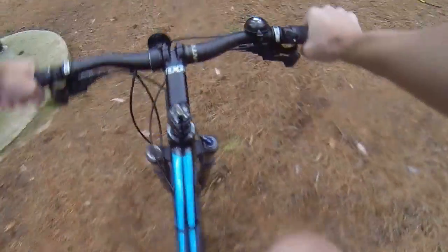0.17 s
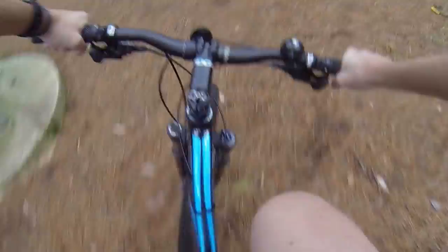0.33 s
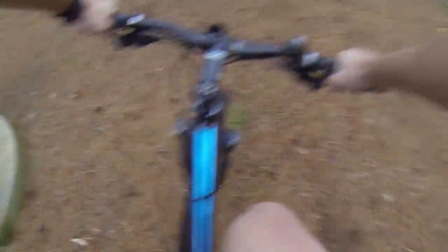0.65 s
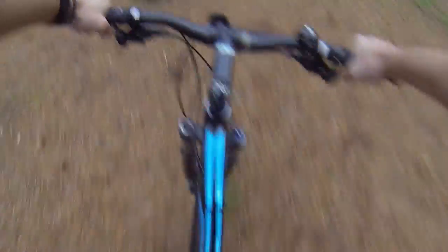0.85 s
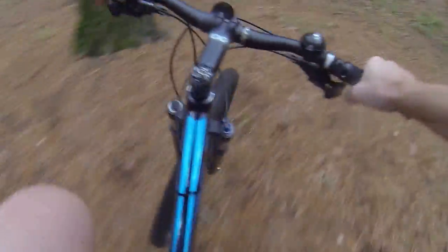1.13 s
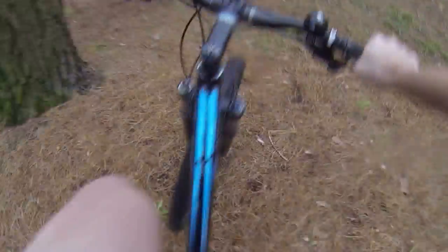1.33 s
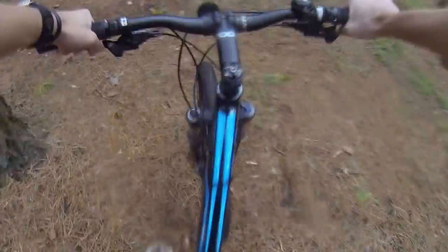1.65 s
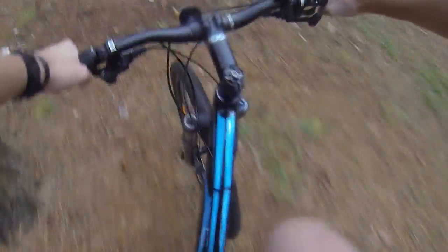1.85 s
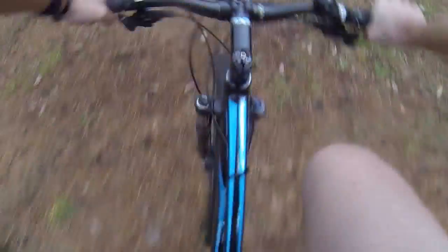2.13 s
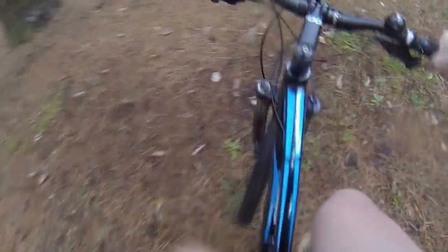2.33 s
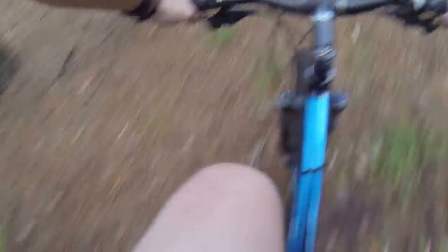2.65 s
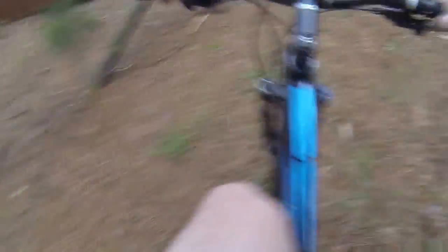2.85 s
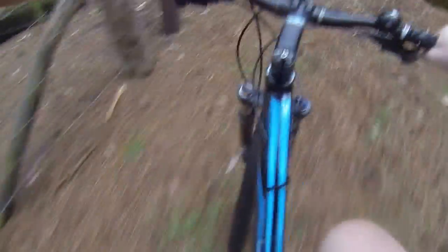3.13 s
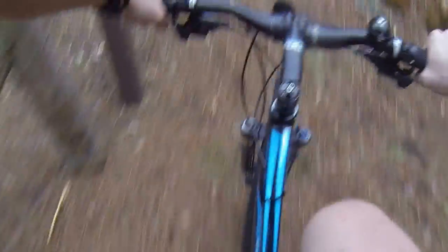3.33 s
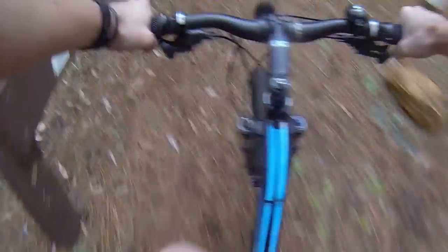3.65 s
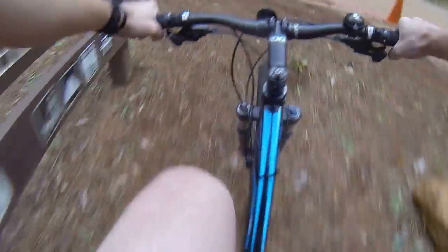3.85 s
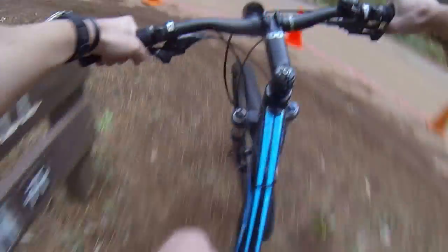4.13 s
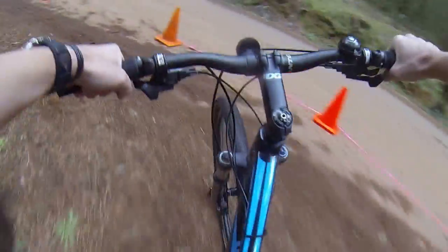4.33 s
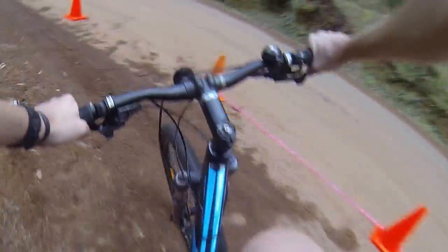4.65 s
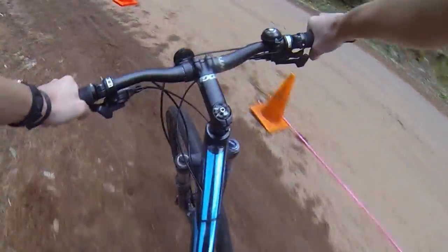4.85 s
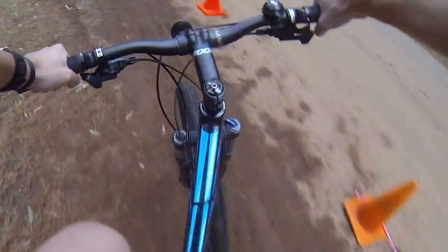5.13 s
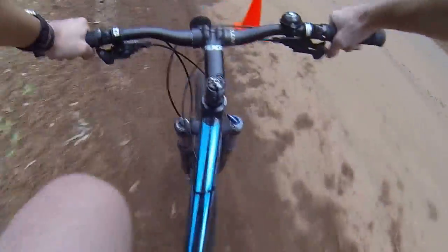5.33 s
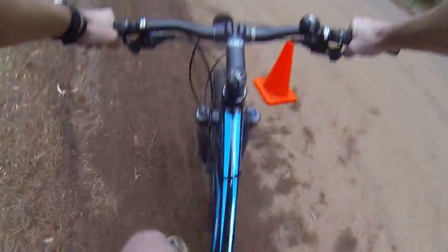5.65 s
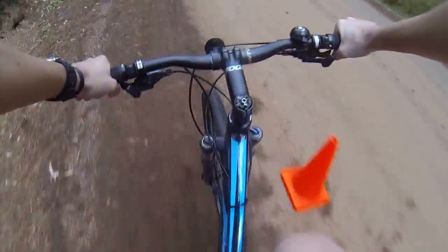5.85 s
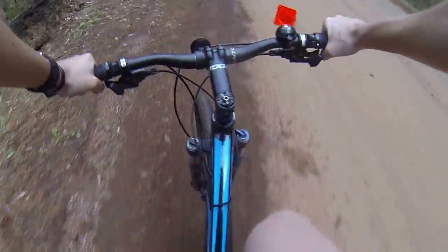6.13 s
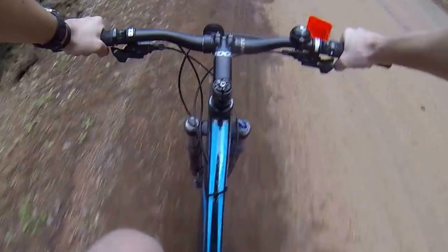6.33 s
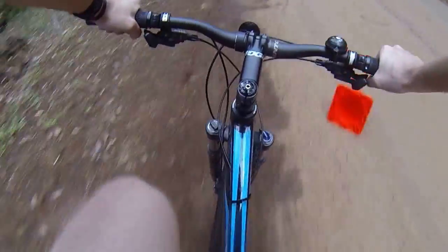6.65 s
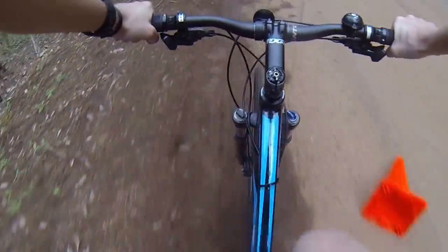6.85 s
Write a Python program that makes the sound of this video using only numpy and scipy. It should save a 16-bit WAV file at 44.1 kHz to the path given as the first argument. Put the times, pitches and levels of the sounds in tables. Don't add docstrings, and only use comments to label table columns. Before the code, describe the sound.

The microphone is in a closed plastic case on a mountain bike rider, so everything is boxy, mid-heavy and close. A brief deep lurch opens it, then tyres crunch in uneven bursts over needles and twigs. From 0.35 to 1 second, soft low thumps of the mount mix with dry clicks of chain and cable. Heavy, dull pressure jolts land at 1.3 and, hardest, 1.7. After a quieter stretch, small squeaky rubs come around 2.5, then the strongest humming knocks and a sharp rattle at 2.7 to 2.85. Another jolt falls at 3.4. Around 3.7 a short rub leads onto gravel, with softer crunches and lighter knocks. Bright cracks snap at 4.6 and 5.95, metallic ticks cluster near 4.9, and a short jolt hits at 5.6. Faint wind and fine spray increase slightly toward the end, with ticks near 6.85. Thin hiss, high whine and fast buzz stay very faint throughout.

```python
import sys
import numpy as np
from scipy import signal
from scipy.fft import rfft, irfft, next_fast_len
from scipy.io import wavfile
from scipy.ndimage import uniform_filter1d, map_coordinates

SR = 44100
rng = np.random.default_rng(int(sys.argv[2]) if len(sys.argv) > 2 else 0)


def to_linear_factor(level_db):
    exponent = np.asarray(level_db, float) / 20
    return 10 ** exponent


def transcribe(signal):
    frames = np.atleast_2d(signal).T
    limited = np.clip(frames, -1, 1)
    pcm = np.round(limited * 32767).astype(np.int16)
    wavfile.write(sys.argv[1], SR, pcm)


N = 307818
TIME = np.arange(N) / SR

# time_s, rolling_db, fine_grit_db, tremor_db
TRACK = [(0, -51, -75, -41.5), (.21, -60, -74, -45.5), (.39, -48, -67, -44), (.56, -51.5, -68, -36.5),
         (1.06, -55.5, -70.5, -43), (1.7, -54.5, -69, -41.5), (2.1, -50.5, -72, -45.5),
         (2.55, -55, -80, -39), (2.82, -49.5, -64, -31), (3.13, -55, -75, -47), (3.56, -61.5, -82, -41.5),
         (3.72, -56, -62, -50), (4.35, -56, -68, -44), (4.6, -57, -73, -39), (5.77, -58, -69.5, -42),
         (6.24, -55, -69.5, -42.5), (6.71, -62.5, -68.5, -37.5), (6.98, -57.5, -67, -42.5)]
# time_s, body_sway_db, seal_wind_db
RIDER_COURSE = [(0, -17, -79), (.15, -50, -89), (.35, -32, -79), (1.0, -32, -85), (1.3, -35, -82.5),
                (1.9, -33, -81.5), (2.3, -32, -81), (2.8, -31, -76.5), (3.2, -32, -87), (3.7, -30, -81),
                (4.3, -33.5, -82), (5.0, -31, -85), (5.6, -33.5, -80.5), (5.78, -37, -74),
                (6.05, -38.5, -78.5), (6.4, -32.5, -73), (6.65, -32, -75), (6.98, -30, -73.5)]
# pitch_hz, width_hz, level_db
STRUCK_CASE = [(1020, 860, 7.5), (1500, 930, 1), (2200, 870, -9.5), (2830, 520, -7), (3690, 820, -10),
               (5190, 670, -7.5), (8500, 1900, -49)]


def unit(x):
    return x / np.sqrt(np.mean(x ** 2) + 1e-20)


def curves(rows):
    s, *columns = np.transpose(rows)
    return [np.interp(TIME, s, column) for column in columns]


def wobble(rate_hz):
    knots = rng.standard_normal(int(N * rate_hz / SR) + 4)
    return map_coordinates(knots, [TIME * rate_hz])


def filtered(x, response):
    size = next_fast_len(N + SR // 2)
    spectrum = rfft(x, size) * response(np.fft.rfftfreq(size, 1 / SR))
    return irfft(spectrum, size)[:N]


def coloured(points):
    hz, db = np.transpose(points)
    gain = lambda f: to_linear_factor(np.interp(np.log(f + 1), np.log(hz + 1), db))
    return unit(filtered(rng.standard_normal(N), gain))


def peak(f, hz, width, db):
    return to_linear_factor(db) * 1j * f * width / (hz * hz - f * f + 1j * f * width)


def modes(table):
    def response(f):
        power = sum(abs(peak(f, *row)) ** 4 / to_linear_factor(row[2]) ** 2 for row in table)
        cepstrum = irfft(np.log(np.sqrt(power) + 1e-6))
        cepstrum[1:len(f) - 1] *= 2
        return np.exp(rfft(cepstrum[:len(f)], len(cepstrum)))
    return response


def add(out, s, sound):
    part = out[round(s * SR):][:len(sound)]
    part += sound[:len(part)]


def patchy(x, depth_db):
    z = signal.stft(x, nperseg=256)[2]
    field = uniform_filter1d(rng.standard_normal(z.shape), size=4, axis=0)
    field = uniform_filter1d(field, size=9, axis=1)
    return signal.istft(z * to_linear_factor(depth_db * unit(field)), nperseg=256)[1][:N]


def over_bumps(between_db, rows, rise, fall):
    coarse = TIME[::64]
    s, length, db = np.transpose(rows)[..., None]
    away_db = rise * np.maximum(s - coarse, 0) + fall * np.maximum(coarse - s - length, 0)
    power = np.sum(to_linear_factor(db - away_db) ** 2, axis=0)
    return 10 * np.log10(np.interp(TIME, coarse, power) + to_linear_factor(between_db) ** 2)


def crunch_db(between_db):
    # start_s, length_s, level_db
    twig_patches = [(0.162, .04, -48.5), (0.281, 0.031, -47.5), (0.356, 0.056, -42.5), (0.462, 0.016, -52),
                    (0.505, 0.032, -46.5), (0.59, 0.015, -48.5), (0.713, 0.021, -46), (0.803, 0.024, -47.5),
                    (0.866, 0.031, -49), (0.932, 0.067, -49), (1.198, 0.064, -52), (1.246, 0.071, -45.5),
                    (1.525, 0.026, -54), (1.975, 0.032, -45.5), (2.164, 0.06, -46), (2.313, 0.022, -44.5),
                    (2.46, 0.031, -52.5), (2.59, 0.063, -53), (2.657, 0.041, -46), (2.717, 0.049, -49.5),
                    (2.798, 0.015, -44), (2.869, 0.06, -47), (2.99, 0.029, -58), (3.062, 0.045, -48.5),
                    (3.292, 0.023, -50), (3.386, 0.026, -49), (3.475, 0.049, -56.5)]
    # start_s, length_s, level_db
    gravel_patches = [(3.687, 0.05, -51), (3.77, 0.041, -58), (3.844, 0.064, -51.5), (3.96, .25, -77),
                      (4.233, 0.055, -54.5), (4.36, 0.078, -55.5), (4.53, 0.046, -53), (4.585, 0.016, -55),
                      (4.778, 0.035, -51), (4.854, 0.084, -49), (4.99, 0.021, -47), (5.095, 0.059, -52.5),
                      (5.2, 0.1, -51.5), (5.303, 0.067, -49.5), (5.485, 0.031, -50), (5.579, 0.031, -48.5),
                      (5.659, 0.036, -51), (5.733, 0.018, -56.5), (5.799, 0.068, -56), (5.96, 0.028, -47),
                      (6.132, 0.03, -50), (6.32, 0.043, -66), (6.407, 0.013, -59), (6.47, 0.053, -55),
                      (6.61, 0.052, -52.5), (6.685, 0.089, -50), (6.746, 0.015, -49), (6.825, 0.044, -46.5)]
    return over_bumps(between_db, twig_patches + gravel_patches, rise=840, fall=920)


def shake_db():
    # start_s, length_s, level_db
    rough_ground = [(0.168, 0.068, -39), (0.283, 0.083, -36.5), (0.384, 0.11, -34.5), (0.547, 0.018, -43),
                    (0.794, 0.05, -31), (0.954, 0.025, -43), (1.14, 0.1, -41.5), (1.29, 0.056, -33),
                    (1.647, 0.03, -29.5), (1.978, 0.16, -39), (2.176, 0.071, -36.5), (2.314, 0.075, -46),
                    (2.4, 0.066, -37), (2.673, 0.22, -34.5), (3.077, 0.11, -39), (3.378, 0.03, -35),
                    (3.698, 0.038, -45), (3.849, 0.093, -39), (4.252, 0.067, -52), (4.423, 0.044, -49),
                    (4.588, 0.043, -37), (4.738, 0.095, -38), (4.876, 0.012, -36.5), (5.23, 0.061, -41.5),
                    (5.59, 0.037, -31.5), (5.955, 0.031, -37), (6.139, 0.035, -34.5), (6.493, 0.033, -51),
                    (6.592, 0.03, -51), (6.717, 0.057, -46)]
    tremor_db = curves(TRACK)[2]
    return over_bumps(tremor_db - 1.5, rough_ground, rise=500, fall=370)


def crackle(rate_hz, spread_db):
    hit = rng.random(N) < rate_hz / SR
    size_db = spread_db * np.minimum(rng.exponential(size=N), 2.6)
    return unit(hit * rng.standard_normal(N) * to_linear_factor(size_db))


def wall(f):
    steps = [(3580, 2.4), (5850, 25)]  # Hz, loss in dB
    return np.prod([to_linear_factor(-loss_db / (1 + (hz / (f + 1)) ** 40)) for hz, loss_db in steps], axis=0)


def tyres():
    # pitch_hz, width_hz, level_db
    case_modes = [(1390, 340, 2), (2104, 720, -3), (3140, 1340, -9), (4630, 1560, -15.5), (5300, 690, -36),
                  (1098, 760, -5.5), (611, 110, -7), (470, 77, -5)]
    # pitch_hz, width_hz, level_db
    grit_modes = [(4670, 2400, 14), (4900, 990, 3.5), (3340, 510, 18.5)]
    drone_modes = [(1246, 122, -0.4), (1405, 120, 1), (1550, 197, -4.0)]
    roll_db, grit_db, _ = curves(TRACK)

    clumps_db = 1.1 * wobble(22) + 1.6 * wobble(110)
    grains = .7 * rng.standard_normal(N) + .75 * crackle(1500, spread_db=2.3)
    drive = patchy(grains, depth_db=1.4) * to_linear_factor(clumps_db)
    crunch = unit(filtered(drive, lambda f: modes(case_modes)(f) * wall(f)))
    grit = unit(filtered(drive, lambda f: modes(grit_modes)(f) * wall(f)))
    drone = unit(filtered(patchy(rng.standard_normal(N), depth_db=2.0), modes(drone_modes)))

    bump_grit_db = -25
    gritty_db = crunch_db(grit_db + 3.0 - bump_grit_db) + bump_grit_db
    return to_linear_factor(crunch_db(roll_db - 1.5)) * crunch + to_linear_factor(gritty_db) * grit + to_linear_factor(roll_db - 5) * drone


def mount():
    # pitch_hz, width_hz, level_db
    mount_modes = [(135, 33.7, 0), (188.3, 77, -11), (97.7, 60, -6), (286, 71, -27)]
    # peak_s, level_db, pitch_hz
    knocks = [(0.178, -24, 135), (0.373, -19, 138), (0.403, -15, 122), (0.441, -22, 131), (0.472, -27, 141),
              (0.574, -22.5, 126), (0.786, -15.5, 132), (0.833, -22, 135), (0.862, -11.5, 135),
              (0.919, -27, 127), (0.972, -26.5, 146), (1.125, -24.5, 127), (1.165, -31, 113),
              (1.413, -30, 119), (1.983, -26.5, 137), (2.13, -26, 126), (2.196, -22.5, 135),
              (2.328, -23, 137), (2.409, -25, 147), (2.604, -21.5, 125), (2.711, -16.5, 144),
              (2.763, -10, 140.5), (2.831, -6, 136.6), (2.873, -23, 139), (2.915, -21.5, 131),
              (3.016, -20.5, 136), (3.097, -29, 111), (3.273, -37.5, 159), (3.384, -28, 136),
              (3.748, -29.5, 133), (3.845, -28, 135), (3.887, -29.5, 127), (4.248, -28, 127),
              (4.47, -24.5, 135), (4.596, -22, 124), (4.665, -25, 145), (4.721, -27, 130),
              (4.784, -24.5, 143.5), (4.904, -27, 118), (5.017, -31, 107), (5.122, -26.5, 149),
              (5.241, -27, 132.5), (5.382, -30.5, 136), (5.587, -25, 146), (5.964, -23.5, 128),
              (6.156, -26, 126), (6.47, -30.5, 123), (6.552, -24.5, 135), (6.593, -26, 119),
              (6.731, -20.5, 120), (1.3, -27, 69), (3.398, -20, 88), (1.651, -14.0, 147.6)]
    lumps = to_linear_factor(1.4 * wobble(18))
    hum = unit(filtered(rng.standard_normal(N) * lumps, modes(mount_modes)))

    blows, t = np.zeros(N), np.arange(SR // 5) / SR
    swell = (1 - np.exp(-t / .0045)) ** 2
    for s, db, hz in knocks:
        decay = to_linear_factor(db + 3.0 - 60 * t / 0.074)
        add(blows, s - .003, decay * swell * np.sin(2 * np.pi * hz * t))
    return to_linear_factor(shake_db() - 3.0) * hum + blows


def body_sway():
    # pitch_hz, level_db (per Hz)
    sway_spectrum = [(2.4, -35), (4.0, 5.5), (21, 0.5), (31, -3), (36, -8), (43, -17.5), (90, -27.5),
                     (120, -71), (200, -120)]
    sway_db = curves(RIDER_COURSE)[0]
    return to_linear_factor(sway_db - 9 + 2.4 * wobble(9)) * coloured([(1, -40)] + sway_spectrum)


def body_rumble():
    spread_s, growth = 0.052, 2.24
    felt_db = uniform_filter1d(shake_db(), round(spread_s * SR))
    lumps = to_linear_factor(3.6 * wobble(10)) * rng.standard_normal(N)
    body = lambda f: modes([(65, 45, 0)])(f) / (1 + (f / 130) ** 4)
    return to_linear_factor(-54.5 + growth * (felt_db - felt_db.mean())) * unit(filtered(lumps, body))


def seal_wind():
    # pitch_hz, level_db (per Hz)
    leak_spectrum = [(4500, -16), (5800, 4.5), (6300, 2.5), (7000, 5), (7700, 5), (9000, -2.5),
                     (12000, -6.5), (15000, -9.5)]
    wind_db = curves(RIDER_COURSE)[1]
    return to_linear_factor(wind_db + 2.0 + 1.1 * wobble(11)) * patchy(coloured(leak_spectrum), depth_db=3.5)


def gravel_spray():
    # pitch_hz, width_hz, level_db
    spray_modes = [(2670, 350, 5), (3410, 650, 0), (4370, 730, -10.5), (5760, 350, -9)]
    wind_db = curves(RIDER_COURSE)[1]
    spray = unit(filtered(rng.standard_normal(N), modes(spray_modes)))
    return to_linear_factor(wind_db + 9) * patchy(spray, depth_db=3.5)


def electronics():
    # pitch_hz, level_db (per Hz)
    hiss_spectrum = [(200, -46), (400, -7), (3000, -11), (6000, -25.5), (10000, -28), (14000, -29),
                     (16000, -40)]
    cycle_s, whine_hz, buzz_hz = .02, 10762, 8400
    since = (TIME - .0128) % cycle_s
    cycle = ((TIME - .0128) // cycle_s).astype(int)
    whine = np.sin(2 * np.pi * whine_hz * since) * (since < .018)
    phase = rng.uniform(0, 2 * np.pi, int(N / SR / cycle_s) + 2)[cycle]
    buzz = np.sin(2 * np.pi * buzz_hz * since + phase) * (since > .0006) * (since < .0067)
    return to_linear_factor(-72.3) * whine + to_linear_factor(-73.0) * buzz + to_linear_factor(-64) * coloured(hiss_spectrum)


def heaves():
    # peak_s, peak (0-1), half_length_s
    trunk_moves = [(0.171, 0.03, 0.022), (0.453, 0.04, 0.014), (0.801, 0.03, 0.017), (1.145, 0.02, 0.013),
                   (1.585, 0.04, .015), (2.19, 0, 0.017), (2.369, 0.01, .018), (2.483, 0.03, 0.026),
                   (2.57, 0.01, 0.011), (2.725, 0.01, 0.014), (2.965, .04, 0.022), (3.14, 0.03, 0.017),
                   (3.216, 0, 0.013), (3.609, .02, 0.016), (3.805, 0.04, 0.016), (4.405, 0.04, 0.018),
                   (4.122, .04, 0.026), (4.276, .02, 0.027), (4.567, 0.01, 0.016), (4.75, 0.03, .012),
                   (4.869, .038, 0.022), (4.955, 0.01, 0.028), (5.117, 0.05, 0.03), (5.203, 0.03, 0.017),
                   (5.277, 0.03, 0.03), (5.361, .018, 0.016), (5.538, 0.04, 0.01), (5.739, .04, 0.027),
                   (5.864, 0.02, 0.014), (5.947, 0.04, 0.018), (6.109, .02, 0.013), (6.221, 0.03, 0.024),
                   (6.408, 0.02, 0.015), (6.817, 0.03, 0.019)]
    out = np.zeros(N)
    for s, top, length in trunk_moves:
        u = np.arange(-4 * length, 4 * length, 1 / SR) / length
        add(out, s - 4 * length, top * (1 - u ** 2) * np.exp(-u ** 2 / 2))
    return out


def crack_burst():
    t = np.arange(1, SR // 25) / SR
    return np.r_[1.2, .09 * rng.standard_normal(len(t)) * to_linear_factor(-60 * t / .011)]


def dulled(x, loss_db):
    return filtered(x, lambda f: to_linear_factor(-loss_db / (1 + (5800 / (f + 1)) ** 16)))


def rattles():
    # start_s, level_db, pitch_hz, body_db
    loose_parts = [(0.47, -34, 1210, -17), (.517, -29, 1350, -33), (0.7225, -24, 2750, -13),
                   (0.7242, -22, 1400, -17), (.782, -18, 1550, -26), (.803, -15, 1090, -26),
                   (.859, -26, 1440, -14), (0.985, -21, 3100, -27), (0.986, -17, 1450, -22),
                   (.9875, -24, 2300, -20), (1.294, -20, 1530, -13), (1.647, -29, 800, -10),
                   (2.463, -22, 1070, -12.5), (2.707, -18, 1220, -33), (2.758, -16, 1260, -36),
                   (2.806, -21, 2500, -16), (2.809, -13, 1300, -19), (2.8232, -20, 2870, -22),
                   (2.8288, -9.5, 1560, -19), (3.404, -29, 1200, -19), (4.587, -25, 1820, -3),
                   (4.591, -24.5, 1170, -5), (4.857, -22, 2360, -13), (4.886, -18, 2290, -10.5),
                   (4.915, -17.5, 2200, -14), (5.583, -30.5, 1390, -3), (5.6, -25, 1510, -13),
                   (5.957, -21, 2200, -21), (5.9571, -16, 3000, -22), (5.959, -18, 2290, -15),
                   (6.327, -29, 1430, -14), (6.3594, -33, 2100, -22), (6.416, -20.5, 1390, -29),
                   (6.826, -26, 1360, -26), (6.866, -19.5, 2200, -18), (6.962, -32, 2750, -27)]
    # start_s, level_db
    cable_ticks = [(.162, -38), (.351, -37), (.391, -20), (.605, -36), (.933, -41), (1.24, -32),
                   (2.162, -34), (2.306, -36), (2.665, -35), (3.293, -35), (3.902, -35), (4.757, -29),
                   (5.012, -22), (5.144, -27), (5.975, -30), (6.1348, -26), (6.233, -34), (6.618, -25),
                   (6.686, -28), (6.761, -29), (.283, -41), (.584, -35), (.714, -37), (1.35, -22.5),
                   (1.522, -34), (1.963, -31), (2.596, -33), (2.866, -34), (2.905, -28), (3.054, -33),
                   (3.694, -31), (3.713, -31), (3.773, -37), (6.589, -26), (6.842, -24), (6.872, -17)]
    # start_s, level_db
    stone_taps = [(.2723, -36), (.3421, -33), (.5053, -27), (.8285, -37), (.9727, -25), (1.737, -37),
                  (1.9779, -35), (2.142, -34), (2.6254, -28), (3.2555, -39), (3.4695, -34), (4.9861, -33),
                  (5.22, -32), (6.0985, -34), (6.8199, -39)]
    hits = loose_parts + [(s, db, 1296, -43) for s, db in cable_ticks]
    hits = hits + [(s, db, 2300, -30) for s, db in stone_taps]

    body, middle, edge, rings = np.zeros((4, N))
    t = np.arange(SR // 25) / SR
    for s, db, hz, body_db in hits:
        crack = crack_burst()
        edge_db = -53.5 + 0.3 * (db + 29) + 30 + 3.5 * rng.standard_normal()
        add(body, s, to_linear_factor(db + body_db + 14.5) * crack)
        add(middle, s, to_linear_factor(db + 7.0) * crack)
        add(edge, s, to_linear_factor(edge_db) * crack)
        ring = to_linear_factor(db - 12.0 - 60 * t / 0.013) * (1 - np.exp(-t / 0.00059))
        add(rings, s, ring * np.sin(2 * np.pi * hz * t))

    cracks = filtered(body, modes(STRUCK_CASE[:1])) + filtered(middle, modes(STRUCK_CASE[1:4]))
    cracks = cracks + filtered(edge, modes(STRUCK_CASE[4:]))
    return dulled(rings + cracks, loss_db=16)


def jolts():
    # peak_s, peak (0-1), push_length_s, pull_before (0-1), rebound_after (0-1)
    hard_jolts = [
        (1.324, .47, .025, .27, .6),
        (1.457, .125, .028, .05, .78),
        (1.671, .79, .02, .42, .56),
        (2.815, .05, .03, .5, .6),
        (3.359, .05, .03, .3, .4),
        (3.422, .27, .026, .25, .7),
        (3.948, .07, .035, .4, .5),
        (5.614, .48, .019, .12, .62),
    ]
    # peak_s, peak (0-1)
    nudges = [(.315, 0.03), (.347, 0.04), (.424, 0.06), (0.583, 0.04), (.829, 0.02), (.893, 0.03),
              (1.264, 0.02), (2.148, 0.04), (2.27, 0.03), (2.329, 0.03), (2.688, 0.04), (2.742, 0.01),
              (2.838, 0.05), (3.548, 0.03), (3.614, 0.02), (3.75, 0.02), (3.813, 0.01), (3.874, 0.03),
              (4.055, 0.03), (4.402, 0.02), (4.47, 0.02), (4.711, 0.02), (5.166, 0.03), (5.433, 0.03),
              (5.491, 0.03), (5.558, 0.07), (6.35, 0.02), (6.654, 0.03), (6.809, 0.02), (6.914, 0.03)]
    lurches = [(s, top, .018, 0.7, 0.59) for s, top in nudges]

    def lobe(length, lean):
        return np.sin(np.pi * (np.arange(round(length * SR)) / (length * SR)) ** lean)

    pressure, slaps = np.zeros(N), np.zeros(N)
    for s, top, length, pull, rebound in hard_jolts + lurches:
        add(pressure, s - 1.6 * length, -pull * top * lobe(1.1 * length, 2.2))
        add(pressure, s - .5 * length, top * lobe(length, 1.1))
        add(pressure, s + .5 * length, -rebound * top * lobe(1.45 * length, .62))
        add(pressure, s + 1.95 * length, .04 * top * lobe(2.5 * length, 1))
        slap = lobe(.018, 0.39) * rng.standard_normal(round(.018 * SR))
        add(slaps, s - length, top * to_linear_factor(-11.5) * slap)
    dull_slaps = filtered(slaps, modes([(196, 99, 3), (335, 590, -19.0), (700, 750, -15.5)]))
    return dull_slaps + filtered(pressure, lambda f: np.exp(-(f / 165) ** 2))


def rubs():
    # start_s, length_s,
    # level_db, pitch_hz, hiss_db
    cable_rubs = [(2.44, .022, -56, 2950, -72), (2.493, .006, -52, 3300, -70),
                  (2.534, .015, -54, 3250, -72), (2.559, .009, -54, 2760, -75), (3, .018, -53, 2620, -80),
                  (2.624, .008, -53, 2850, -75), (.459, .0166, -65, 7580, -85),
                  (3.771, .024, -51, 2200, -67), (3.772, .033, -49, 1370, -67),
                  (6.358, .011, -52, 2850, -80), (2.8055, .002, -70, 5200, -60),
                  (2.8095, .002, -70, 5200, -60), (5.9567, .0025, -57, 3200, -57)]
    out = np.zeros(N)
    for s, length, db, hz, hiss_db in cable_rubs:
        u = np.arange(round(length * SR)) / (length * SR)
        slip_noise, hiss = rng.standard_normal((2, 4096))[:, :len(u)]
        slip = uniform_filter1d(uniform_filter1d(slip_noise, size=50), size=50) * 4.5
        t = length * u
        tone = np.sin(2 * np.pi * hz * t * (1 - 2.16 * t))
        squeak = to_linear_factor(db + 2.5) * (1 + slip) * tone
        add(out, s, np.sin(np.pi * u) ** 0.12 * (squeak + to_linear_factor(hiss_db) * hiss))
    return filtered(out, lambda f: 1 / (1 + 1j * f / 12000))


def snaps():
    # start_s, level_db
    bright_clicks = [(.605, -35), (.724, -22), (.783, -25), (.804, -24), (.986, -20), (1.294, -27),
                     (2.595, -30), (2.806, -19), (2.81, -20), (2.824, -26), (4.59, -12), (4.798, -27),
                     (4.858, -26), (4.884, -27), (5.958, -13), (6.866, -27)]
    cracks = np.zeros(N)
    for s, db in bright_clicks:
        add(cracks, s, to_linear_factor(db) * crack_burst())
    return dulled(filtered(cracks, modes(STRUCK_CASE[4:])), loss_db=7)


def scene():
    ground = tyres() + gravel_spray() + mount()
    rider = body_sway() + body_rumble() + heaves() + jolts()
    contacts = rattles() + rubs() + snaps()
    return (ground + rider + contacts + seal_wind() + electronics())[None]


def top_cut(x):
    return signal.sosfilt(signal.butter(12, 15590, fs=SR, output="sos"), x)


def record(dry):
    # start_s, length_s
    dull_moments = [(0.233, 0.046), (0.78, 0.024), (0.846, 0.034), (0.987, 0.024), (1.45, 0.051),
                    (1.558, 0.074), (1.626, 0.036), (2.945, 0.048), (3.33, 0.11), (3.518, 0.094),
                    (3.885, 0.037), (3.929, 0.044), (4.05, 0.092), (4.374, 0.09), (4.845, 0.024),
                    (5.162, 0.05), (5.458, 0.026), (5.719, 0.046), (5.91, 0.085), (6.529, 0.046),
                    (6.912, 0.034)]
    kept = filtered(dry[0], lambda f: 1 / (1 + (f / 15050) ** 200))
    top_band = filtered(kept, lambda f: f > 12750)
    lost = sum((TIME > s) * (TIME < s + length) for s, length in dull_moments) * 1.
    lost = np.minimum(uniform_filter1d(lost, size=300), 1)
    mix = (kept - lost * top_band)[None]
    return top_cut(mix)


dry = scene()
out = record(dry)
transcribe(out)
```